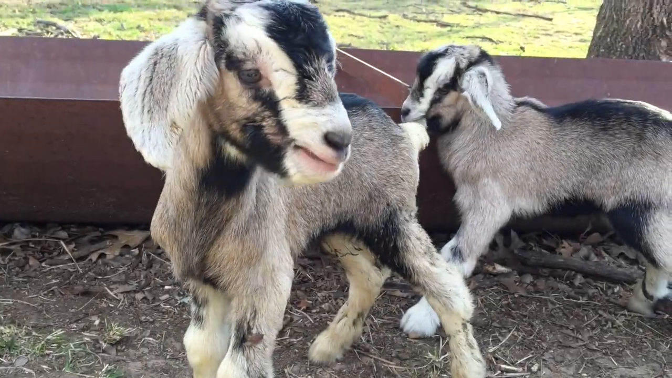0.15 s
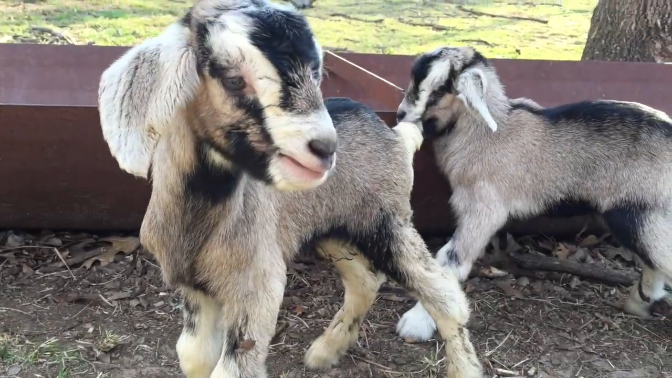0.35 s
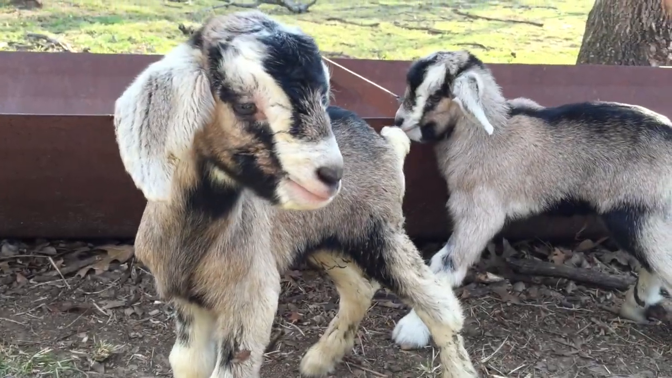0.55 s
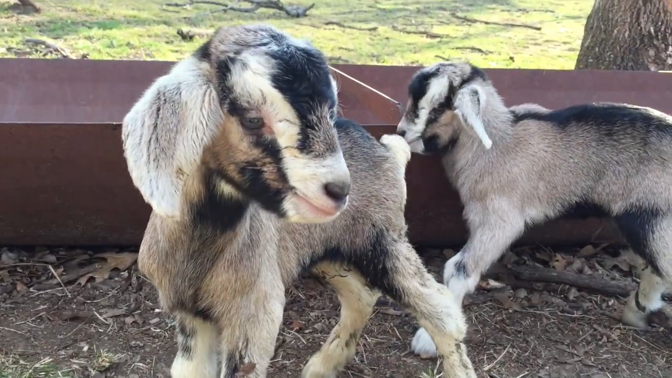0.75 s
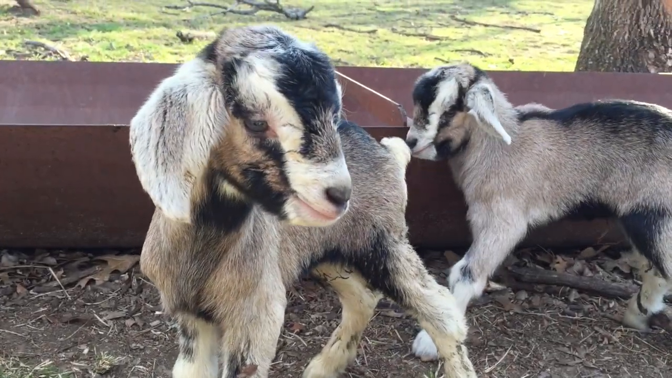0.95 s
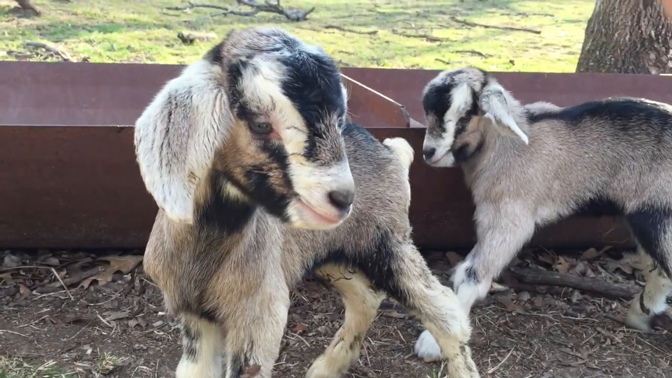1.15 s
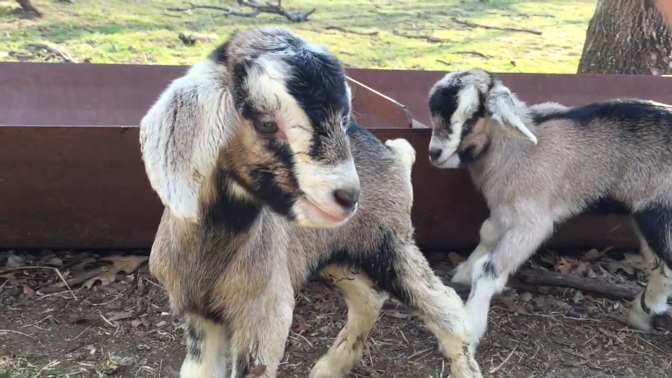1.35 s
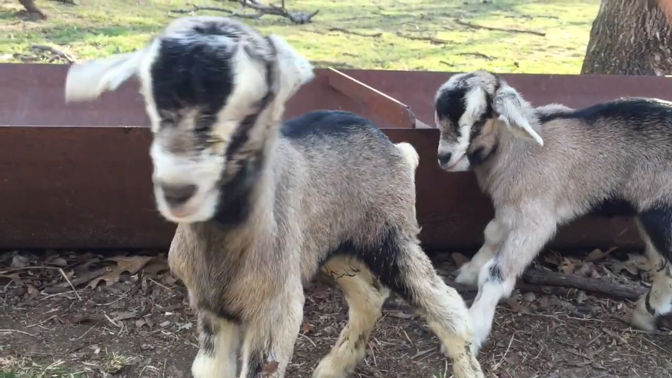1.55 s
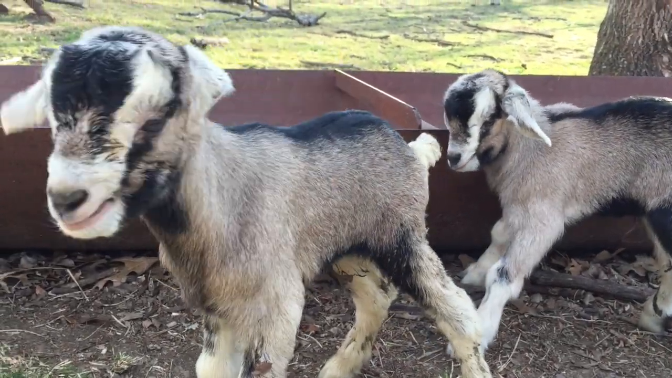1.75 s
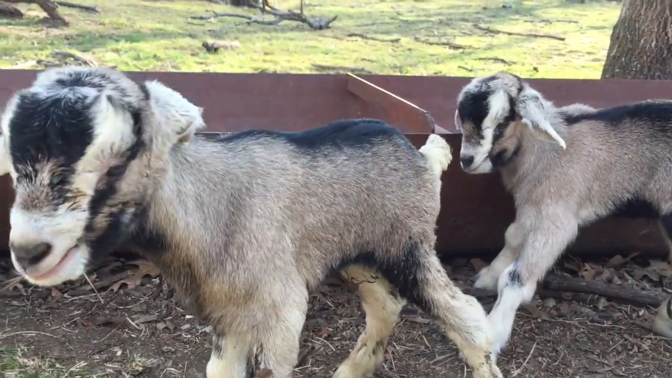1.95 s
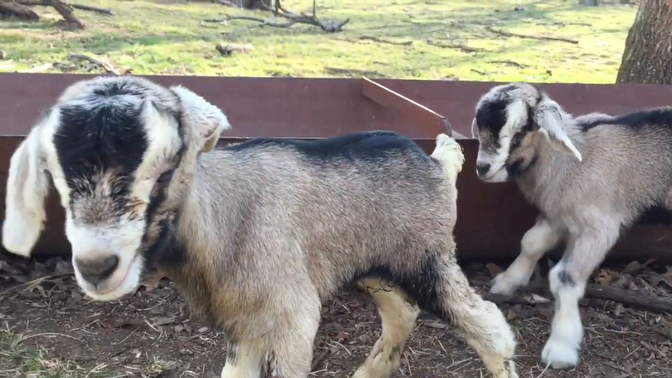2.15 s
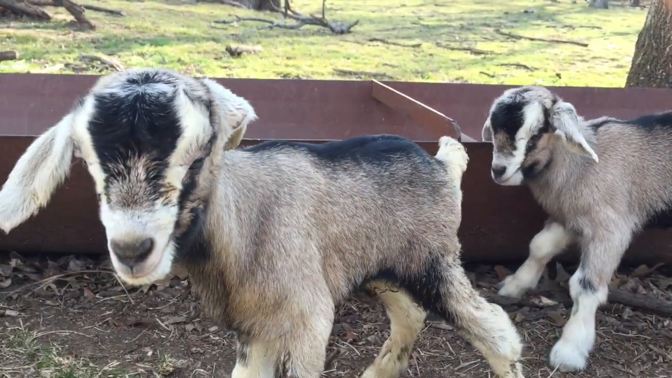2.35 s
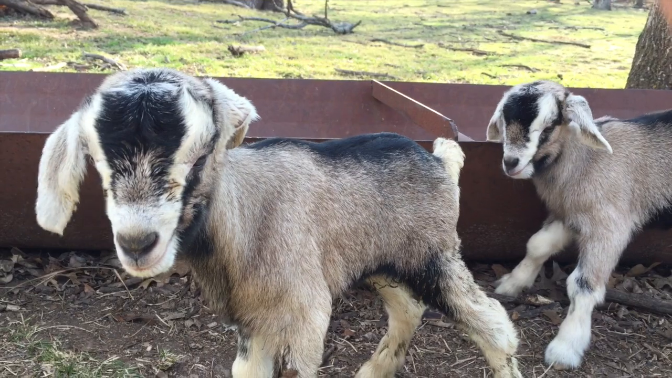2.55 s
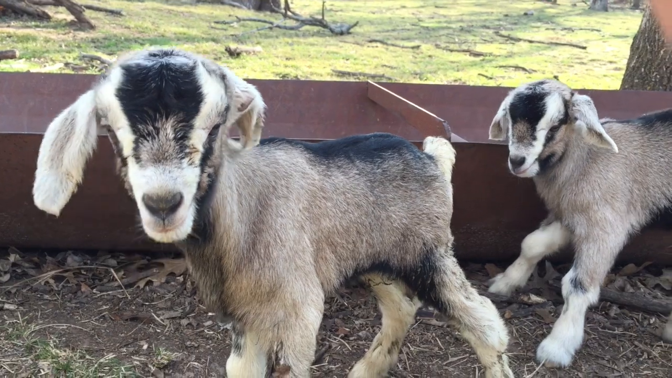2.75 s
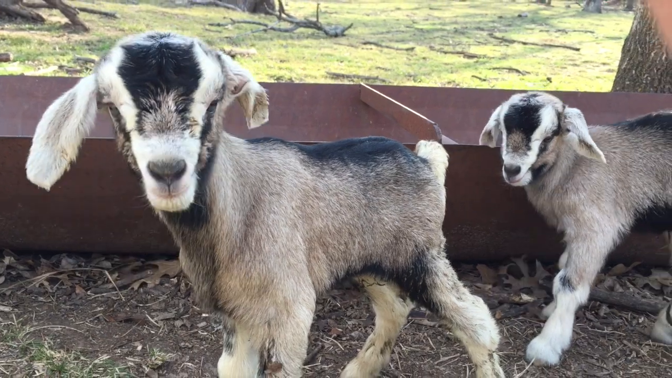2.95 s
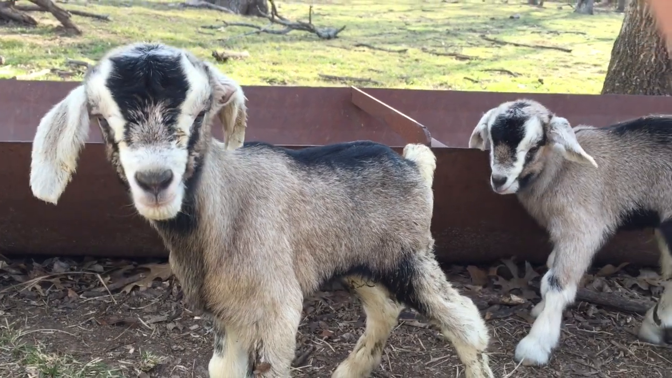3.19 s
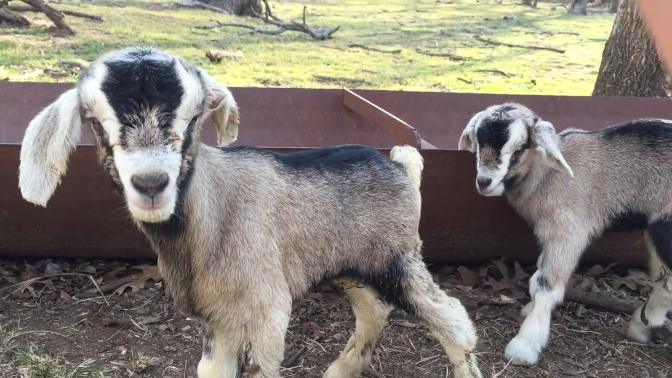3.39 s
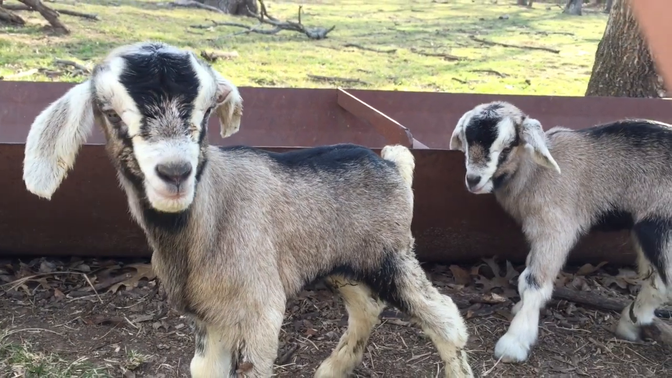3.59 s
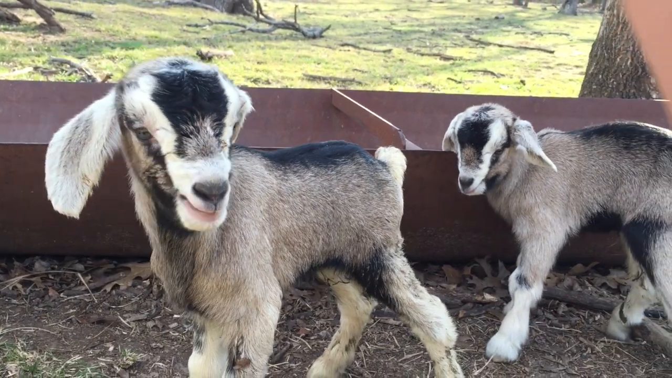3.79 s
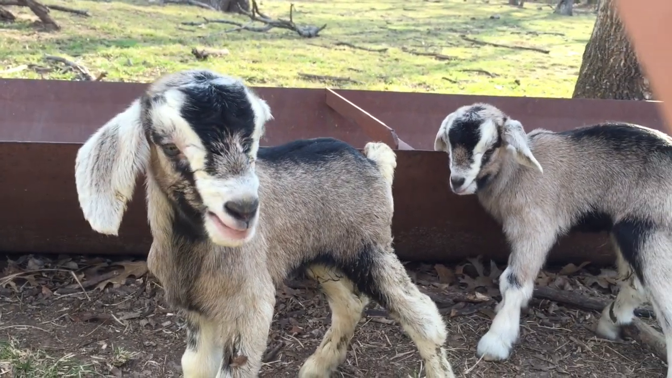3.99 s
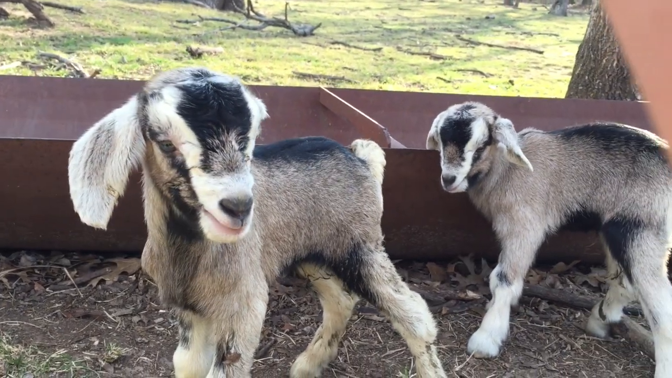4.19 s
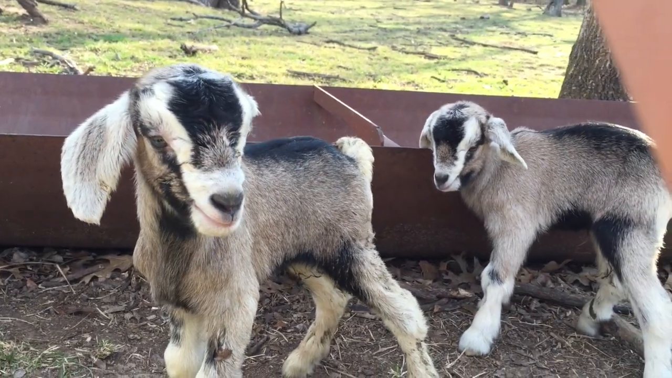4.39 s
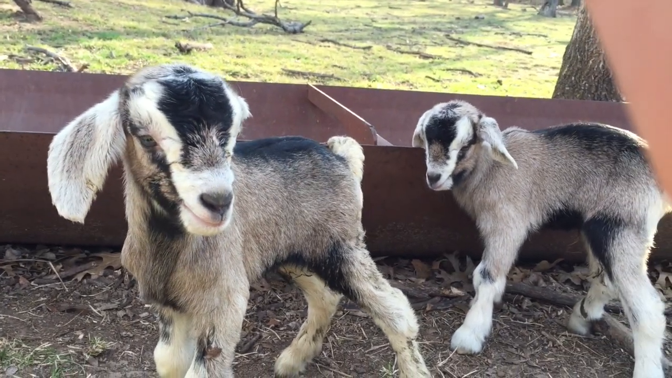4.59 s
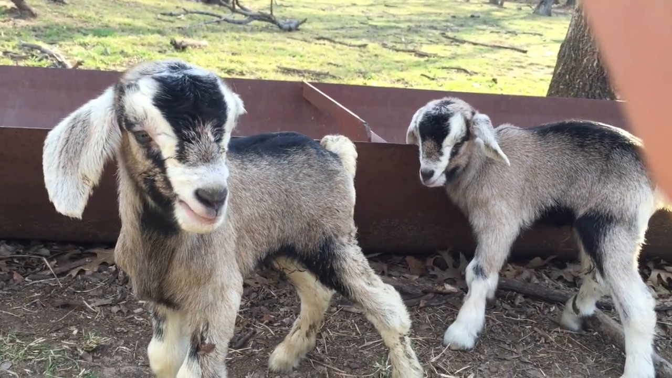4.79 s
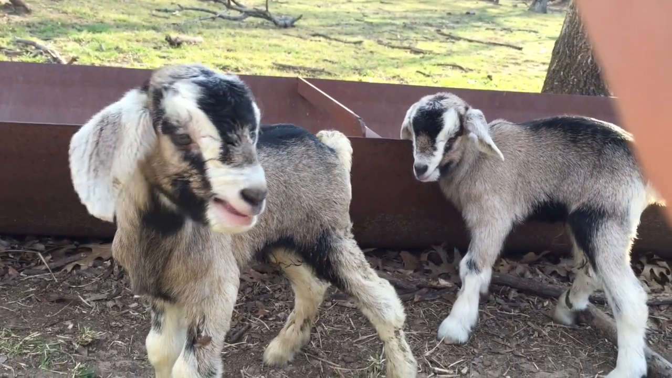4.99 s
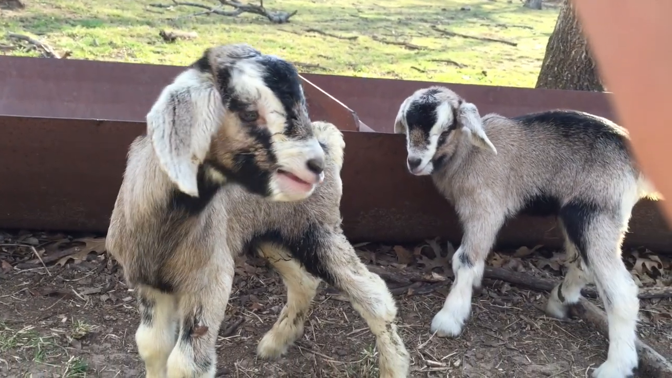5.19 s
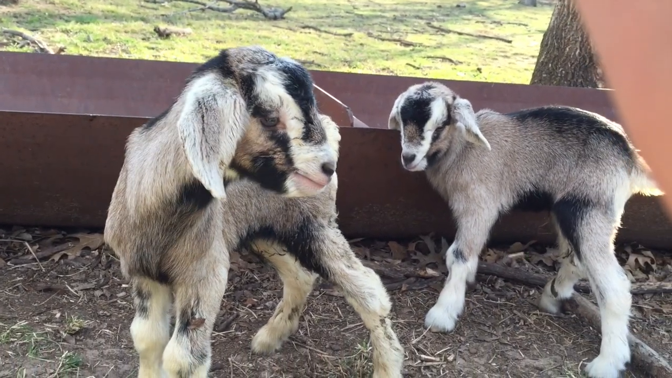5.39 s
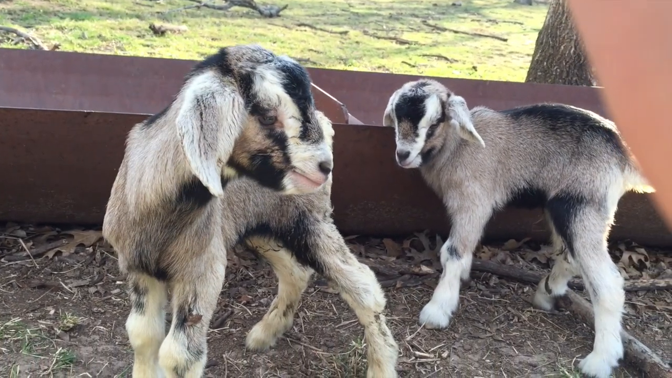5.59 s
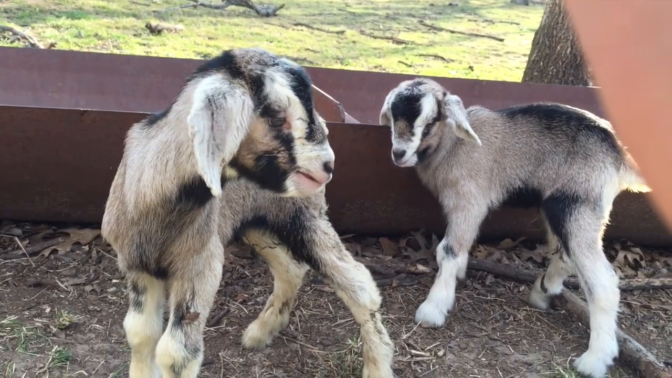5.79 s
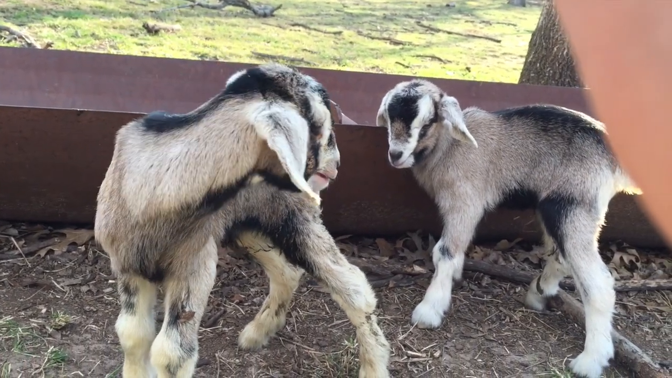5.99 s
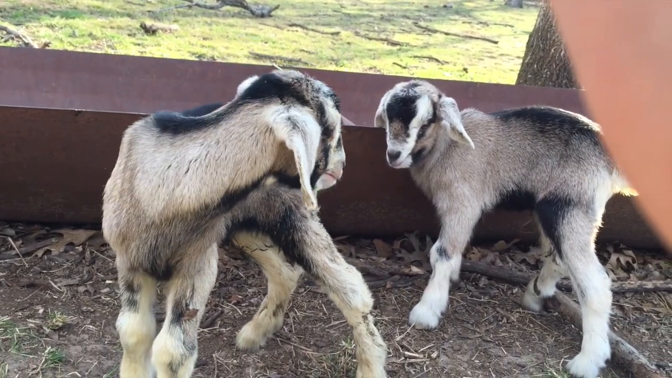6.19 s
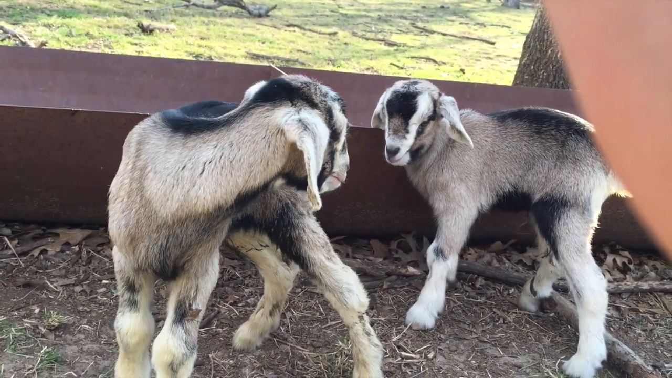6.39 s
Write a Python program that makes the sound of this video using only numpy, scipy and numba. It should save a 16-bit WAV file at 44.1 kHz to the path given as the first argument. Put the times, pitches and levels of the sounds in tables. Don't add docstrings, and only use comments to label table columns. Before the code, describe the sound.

Close outdoor pickup of a young goat giving short, trembling bleats, starting mid-cry and ending mid-cry. Far off another goat holds a steady cry and a fowl squawks hoarsely; later a tiny bird chirps. After the second bleat, straw rustles and another kid murmurs a quieter, breathy bleat. Two brighter, stronger bleats follow, then a late swelling one. Soft low yard hush and little breeze puffs on the microphone run underneath, with barely any echo.

```python
import sys
import numpy as np
from scipy import signal
from scipy.io import wavfile
from scipy.ndimage import uniform_filter1d
from numba import njit

SR = 44100
rng = np.random.default_rng(int(sys.argv[2]) if len(sys.argv) > 2 else 0)


def field_ratio(decibels):
    return 10 ** (np.asarray(decibels, dtype=float) / 20)


def store_wav(level_fs):
    pcm = np.round(np.clip(np.atleast_2d(level_fs), -1, 1) * 32767)
    wavfile.write(sys.argv[1], SR, pcm.T.astype(np.int16))


N = 284004
T = np.arange(N) / SR

# [f/Hz, density/dB per Hz]
HUSH = [(15, -40), (25, -21), (55, -14.5), (119, -5), (204, -6.5), (483, -27), (851, -18), (1810, -25.5),
        (2180, -8), (2500, -29.5), (3270, -28), (4280, -38.5), (15600, -45)]
HUSH_DB = -61
# [t/s, level/dB, length/s]
GUSTS = [(.01, -71, 0.091), (0.88, -64, 0.046), (1.897, -72, 0.17), (3.196, -58.5, .05),
         (3.436, -65.5, 0.079), (3.74, -60.5, 0.079), (3.931, -53.5, 0.073), (4.351, -58.5, 0.068),
         (4.54, -63.5, .06), (4.694, -61, 0.043), (5.33, -67, .15), (5.94, -59, 0.043),
         (6.109, -55.5, 0.068), (6.33, -57, 0.033)]
CALM_DB = -70.5
# [t/s, f/Hz, level/dB]
FAR_GOAT = [
    (.2, 638, -66),
    (.3, 609, -59),
    (.5, 626, -57),
    (.62, 628, -57),
    (.72, 593, -57),
    (.85, 622, -78),
    (1.0, 637, -75),
    (1.3, 588, -96),
]
# [multiple, level/dB]
FAR_ORDERS = [(1, -23), (2, -1), (3, -8), (4, -8.5), (5, -3), (6, -10.5), (7, -9), (8, -20), (9, -24),
              (10, -26.5), (11, -31.5)]
# [t/s, level/dB]
CHIRPS = [
    (2.09, -67),
    (2.134, -67),
    (2.173, -68),
    (2.31, -65),
    (2.327, -74),
    (2.36, -71),
    (2.385, -74),
    (2.5, -67),
]
# [t/s, length/s, top f/Hz, low line level/dB, high line level/dB]
SQUAWKS = [
    (0.463, 0.25, 1222, -55, -62.5),
    (0.942, .3, 1330, -46.5, -64.5),
]
SQUAWK_RISE_S, SQUAWK_SAG, SQUAWK_SAG_S, SQUAWK_RATIO, SQUAWK_FADE_DB = 0.0377, 0.18, .11, 1.42, -20
# [t/s, length/s, level/dB, f/Hz, width/Hz]
PUFFS = [(0.778, 0.018, -69, 6500, 2510), (1.418, 0.038, -67.5, 7800, 9000),
         (2.231, 0.0117, -71.5, 8450, 9000), (2.825, .012, -75, 11300, 3960),
         (2.865, 0.076, -70.5, 9000, 9000), (2.91, .008, -74, 10900, 5000),
         (2.95, 0.0067, -75, 11100, 4100), (2.988, .013, -59, 5300, 12150),
         (3.005, 0.022, -53, 4400, 13100), (3.04, 0.014, -75, 10500, 3000),
         (3.187, .014, -65.5, 4000, 9000), (3.553, 0.065, -71, 5024, 1163), (3.131, 0.026, -52, 1340, 696)]
# [t/s, length/s, level/dB, f/Hz, width/Hz]
CLUCKS = [
    (0.71, 0.22, -60.5, 1540, 500),
    (0.77, .079, -64, 3950, 2480),
    (1.225, .068, -66.5, 2740, 201),
    (1.264, 0.021, -52.5, 1450, 200),
    (1.303, 0.015, -62, 1575, 595),
    (1.34, 0.013, -61, 1480, 694),
    (2.148, 0.29, -76.5, 2660, 120),
    (2.492, 0.43, -87, 2180, 151),
]
# [t/s, level/dB, f/Hz]
CLICKS = [
    (0.445, -48, 900),
    (0.463, -44, 600),
    (1.54, -41.5, 810),
    (1.556, -37, 587),
    (3.684, -36, 623.7),
    (4.772, -37.5, 690),
    (5.32, -40, 601),
    (5.753, -41.5, 603),
    (3.588, -56, 1407),
    (3.59, -60, 5220),
]
CLICK_S, CLICK_WIDTH_HZ = 0.013, 760

# [t/s, top f/Hz, top level/dB, dip f/Hz]
SOFT_THROBS = [
    (3.145, 360, -64, 400),
    (3.248, 492, -64.5, 474.4),
    (3.352, 500, -60, 448.5),
    (3.455, 493, -61, 444),
]
# [onset t/s, catch/dB, dips/dB, last sink/s, sink depth/dB]
SOFT_BLEAT = [
    (3.112, 5, 9, .05, 9),
]
# [pitch rise, pitch fall, level rise, level fall, fade-out/s]
SOFT_MANNER = [(.5, 1.3, .8, 1.4, .02)]
SOFT_DIP_S = .045
# [f/Hz, width/Hz, level/dB]
SMALL_THROAT = [(1450, 170, 7.5), (2160, 840, -17), (3950, 250, -2), (5120, 410, 0), (6050, 550, -9),
                (9000, 450, -16.5), (12200, 1500, -25)]

# [t/s, top f/Hz, top level/dB, f/Hz of the dip after it]
THROBS = [(0.0, 420, -32, 264), (.105, 437.7, -26, 283.2), (.2, 461, -20.5, 278.8), (.296, 453.8, -22, 269),
          (.4, 425.2, -27, 260.3), (1.58, 413.4, -27.5, 238), (1.673, 420, -27.5, 252),
          (1.768, 432.8, -21.5, 287), (1.863, 454.6, -22.5, 297), (1.965, 453.2, -23, 250.9),
          (3.722, 480.6, -23.5, 395.9), (3.805, 513, -15.5, 432), (3.897, 507.4, -16, 409.2),
          (3.992, 501.6, -17, 371.2), (4.088, 484.3, -20.5, 300.7), (4.188, 462.7, -23, 279),
          (4.286, 390, -30, 265.5), (4.808, 438, -29, 366), (4.904, 474.5, -20.5, 387),
          (4.997, 487, -18.5, 418.4), (5.09, 490.8, -19.5, 392.6), (5.182, 487.5, -22, 385),
          (5.28, 476, -25, 333.5), (5.791, 420, -36, 281), (5.89, 465, -28, 291),
          (5.988, 450, -28.5, 306.4), (6.083, 460.5, -27.5, 324)]
# [onset t/s, catch below the first top/dB, depth of the dips/dB, last sink/s, sink depth/dB]
BLEATS = [
    (-.03, 6, 9, 0.058, 12.5),
    (1.553, 9, 8.5, 0.062, 14.5),
    (3.685, 6.5, 8.5, 0.051, 8),
    (4.784, 4.5, 9, .04, 7.5),
    (5.757, 12, 8, 0.042, 10.5),
]
# [pitch rise, pitch fall, level rise, level fall, fade-out/s]
MANNER = [(0.99, .85, 1.28, 0.47, .04), (1.2, 0.92, 1.7, 0.36, 0.045), (1.3, 0.7, 1.12, 0.62, .025),
          (1.4, 0.95, 1.3, 0.52, 0.023), (0.86, 0.7, 1.24, 0.5, .024)]
CATCH_S, CATCH_RISE, ONSET_DB = .009, 1.05, -28.5
DIP_S, DIP_S_PER_SAG, DIP_DB_PER_SAG = .016, .085, 8.5
# [onset pitch share of first top, second harmonic/dB, throb of fundamental/dB,
# fourth resonance f/Hz at onset, f/Hz at the end]
LARYNX = [(.85, 2.9, 8, 3540, 4100), (0.91, -0.3, 11, 3680, 4000), (.85, -4.4, 13, 3924, 4184),
          (.85, -3.2, 11.5, 3920, 3960), (0.64, 15, -1, 4100, 3944)]
LOUD_LAG_S, SKIRT_HZ = 0.0049, 438
# [lowest harmonics/dB, treble/dB, air above 9 kHz/dB, breathiness 0-1,
# depth of the side-cavity dip 0-1]
HEAD = [(11, -1.1, -8.5, .17, .6), (12, -2.5, 17, .19, .95), (14, 3, -2.5, .05, 0.8), (14, 4, -1.5, .08, 1),
        (5.5, -3, 18, .15, 0.94)]
# [first resonance shut f/Hz, wide f/Hz, opening time/s, share closed at the end 0-1,
# drop of the first under a push 0-1]
JAW = [(980, 1540, 0.41, 0.48, 0.07), (977, 1560, 0.41, 0.13, 0.16), (900, 1458, .06, .35, 0.15),
       (865, 1504, .09, 0.09, .05), (588.4, 1670, 0.13, 0, 0)]
CLOSING_S = .11
SHUT_DB, SECOND_SHUT_DB, SECOND_WIDE_DB = -2.5, 3.5, -1.5
# [second resonance f/Hz at onset, at the end f/Hz, third shut f/Hz, third wide f/Hz,
# third level/dB]
TONGUE_SET = [(2020, 1870, 2600, 2370, -5.5), (2080, 1830, 2820, 2080, -5.5), (2060, 2120, 2200, 2700, -8),
              (2120, 2370, 2600, 3455, -5.5), (1910, 3114, 3270, 3045, -5.5)]
END_SECOND_HZ, END_FOURTH_HZ, END_HOARSE = -200, 400, 0.058
# [depth of the nasal dip 0-1, its f/Hz, change over the bleat of the third resonance/dB,
# of the air above 9 kHz/dB]
NASAL = [(0.8, 740, -3, 7.5), (0.57, 833, -2, -1), (1, 840, -11, -10), (1, 740, -1, 12), (0.02, 740, -6, 4)]
NASAL_WIDTH_HZ = 100
# [width/Hz, level/dB]
MOVING = [
    (168, 4),
    (420, -4),
    (238, -0.5),
]
# [f/Hz, width/Hz, level/dB]
FIFTH = (4070, 2200, -16.5)
# [f/Hz, width/Hz, level/dB]
NOSE = [(5594, 150, -25.5), (6260, 630, -17), (8380, 1420, -21)]
# [f/Hz, width/Hz, level/dB]
AIR = [(10800, 370, -46.5), (12800, 1300, -40), (15000, 1400, -40.5)]
END_UPPER_DB, UPPER_THROB_DB = -5, 0
WANDER = .025

# [delay t/s, level/dB]
BOUNCES = [
    (.0021, -17.5),
    (.0057, -36),
    (.0093, -24),
]
YARD_T60_S, YARD_DB = 0.13, -21
CEILING = .7


@njit
def svf(x, hz, width):
    y, b, l = np.empty(len(x)), 0., 0.
    for i in range(len(x)):
        g, k = np.tan(np.pi * hz[i] / SR), width[i] / hz[i]
        v = (b + g * (x[i] - l)) / (1 + g * (g + k))
        b, l, y[i] = 2 * v - b, l + 2 * g * v, k * v
    return y


def band(x, hz, width):
    return svf(x + 1e-18, np.clip(hz + 0 * x, 20, .45 * SR), np.clip(width + 0 * x, 10, SR))


def unit(x):
    return x / np.sqrt(np.mean(x ** 2))


def walk(rate):
    k = int(SR / rate)
    held = np.repeat(rng.standard_normal(N // k + 1), k)
    return unit(uniform_filter1d(uniform_filter1d(held, k), k)[:N])


def columns(table):
    s, *rest = np.transpose(table)
    return [np.interp(T, s, c) for c in rest]


def echoes(x, t60, dull_hz):
    tail = band(rng.standard_normal(N), dull_hz, 2 * dull_hz)[:SR] * field_ratio(-60 * T[:SR] / t60)
    return signal.fftconvolve(x, tail / np.sqrt(np.sum(tail ** 2)))[:N]


def hush():
    yard, swell = 0, walk(0.93)
    hz_pts, db_pts = np.transpose(HUSH)
    for hz in 40 * 2 ** np.arange(0, 9, .5):
        flicker = (1.2 + 1.3 * (hz < 300)) * walk(7)
        db = np.interp(np.log(hz), np.log(hz_pts), db_pts) + swell + flicker
        yard = yard + field_ratio(db) * band(band(rng.standard_normal(N), hz, hz / 2), hz, hz / 2)
    rumble = band(band(band(rng.standard_normal(N), 75, 70), 62, 110), 51, 90)
    gusts = sum(field_ratio(db) * np.exp(-((T - s) / length) ** 2) for s, db, length in GUSTS)
    breeze = field_ratio(CALM_DB + 2.5 * walk(18.0))
    return unit(yard) * field_ratio(HUSH_DB) + unit(rumble) * (breeze + gusts)


def squawks():
    out = np.zeros(N)
    for start, length, top_hz, low_db, high_db in SQUAWKS:
        since = np.clip(T - start, 0, length)
        rise = np.clip(since / SQUAWK_RISE_S, 0, 1)
        sagging = np.exp(-np.maximum(since - SQUAWK_RISE_S, 0) / SQUAWK_SAG_S)
        hz = top_hz * (1 - SQUAWK_SAG * (1 - rise * sagging))
        shape = np.sqrt(rise) * np.clip((length - since) / 0.013, 0, 1)
        for ratio, db, fade_db in [(1, low_db, SQUAWK_FADE_DB), (SQUAWK_RATIO, high_db, 1.5)]:
            wobble = ratio * hz * (1 + .025 * walk(150))
            level = field_ratio(db + fade_db * since / length + 2.84 * walk(70.83))
            out += shape * level * np.sin(2 * np.pi * np.cumsum(wobble) / SR)
    return out


def far_calls():
    hz, db = columns(FAR_GOAT)
    unsteady = 0.016 * np.clip(T - .45, .1, .5) / 0.23 * walk(150)
    phase = 2 * np.pi * np.cumsum(hz * (1 + unsteady)) / SR
    harmonics = sum(field_ratio(d + 0.65 * walk(45)) * np.sin(k * phase) for k, d in FAR_ORDERS)
    goat = field_ratio(db) * (T > .2) * (T < 1.3) * harmonics
    calls = goat + squawks()
    chirps = sum(field_ratio(d) * np.exp(-((T - s) / 0.0037) ** 2) for s, d in CHIRPS)
    bird = chirps * np.sin(2 * np.pi * 3330 * T)
    return 1.36 * calls + 0.85 * echoes(calls, 1.0, 3640) + bird


def puffs():
    air, out = rng.standard_normal(N) * field_ratio(1.0 * walk(210)), np.zeros(N)
    rows = [tuple(row) + (False,) for row in list(PUFFS) + list(CLUCKS)]
    rows += [(s, CLICK_S, db, hz, CLICK_WIDTH_HZ, True) for s, db, hz in CLICKS]
    for s, length, db, hz, width, sharp in rows:
        reach = 2 * length + .1
        near = slice(max(int((s - reach) * SR), 0), int((s + reach) * SR))
        since = (T[near] - s) / length
        if sharp:
            shape = np.clip(since * 10, 0, 1) * np.exp(-np.abs(since))
        else:
            shape = np.exp(-(since / 0.64) ** 2)
        burst = field_ratio(db) * unit(band(band(air[near], hz, width), hz, 1.1 * width)) * shape
        out[near] += band(burst, hz, 2 * width) if sharp else burst
    return out


def bend(t, s, values, rise, fall):
    place = np.interp(t, s, np.arange(len(s)))
    k = np.minimum(place.astype(int), len(s) - 2)
    swing = .5 - .5 * np.cos(np.pi * (place - k) ** np.where(k % 2, rise, fall))
    return values[k] + swing * (values[k + 1] - values[k]), k, swing


def shudder(throbs, bleats, manner, dip_s, onset_pitch, lag_s):
    hz, db, opening, fade, ends = np.full(N, 400.), np.full(N, -140.), np.zeros(N), np.zeros(N), []
    rows = np.array(throbs)
    owner = np.searchsorted(np.array(bleats)[:, 0], rows[:, 0]) - 1
    for b, (onset_s, catch_db, depth_db, sink_s, sink_db) in enumerate(bleats):
        top_s, top_hz, top_db, dip_hz = rows[owner == b].T
        hz_rise, hz_fall, db_rise, db_fall, out_s = np.clip(manner[b], .005, 3)
        sag = 1 - dip_hz[:-1] / top_hz[:-1]
        dip_at = top_s + np.r_[dip_s + DIP_S_PER_SAG * sag, sink_s]
        between_db = (top_db[1:] + top_db[:-1]) / 2 - depth_db - DIP_DB_PER_SAG * sag
        dip_db = np.r_[between_db, top_db[-1] - sink_db]
        s = np.r_[onset_s, onset_s + CATCH_S, np.ravel([top_s, dip_at], "F")]
        onset_hz = onset_pitch[b] * top_hz[0] * np.array([1, CATCH_RISE])
        pitch = np.r_[onset_hz, np.ravel([top_hz, dip_hz], "F")]
        level = np.r_[top_db[0] + ONSET_DB, top_db[0] - catch_db, np.ravel([top_db, dip_db], "F")]
        end = s[-1] + out_s / 2
        ends.append(end)
        inside = (T >= s[0]) & (T < end)
        t = T[inside]
        hz[inside], _, _ = bend(t, s, pitch, hz_rise, hz_fall)
        late = s + lag_s * np.r_[0, 0, np.tile([1, .5], len(top_s))]
        db[inside], k, push = bend(t, late, level, db_rise, db_fall)
        opening[inside] = np.where(k % 2, push, (1 - push) * (k > 0))
        start = np.clip((t - s[0]) / 0.0056, 0, 1)
        fade[inside] = start ** 0.58 * np.clip((end - t) / out_s, 0, 1)
    return hz, field_ratio(db) * np.sqrt(fade), opening, fade, np.array(ends)


def folds(hz, hoarse):
    slide = np.clip(np.abs(np.gradient(np.log(hz))) * SR / 10, 0, 1)
    jitter = (.06 * hoarse + 0.014 * slide) * walk(250)
    phase = 2 * np.pi * np.cumsum(hz * (1 + jitter)) / SR
    harmonics = sum(np.cos(k * phase) * (k * hz < .37 * SR) for k in range(1, 45))
    pulses = harmonics * np.sqrt(2 * hz / SR) * 2
    breath = rng.standard_normal(N) * (1 + np.cos(phase - .6))
    return -pulses * field_ratio(5 * hoarse * walk(250)), breath, phase


def tract(x, modes, start=0):
    return sum((-1) ** (k + start) * field_ratio(db) * band(x, hz, width) for k, (hz, width, db) in enumerate(modes))


def narrows(x, modes):
    return sum(field_ratio(db + 2.3 * walk(30)) * band(band(x, hz, 1.6 * width), hz, 1.6 * width)
               for hz, width, db in modes)


def second_kid():
    hz, gain, opening, fade, _ = shudder(SOFT_THROBS, SOFT_BLEAT, SOFT_MANNER, SOFT_DIP_S, [.9], 0)
    pulses, breath, phase = folds(hz, 0.012)
    source = pulses * opening ** 2 + .2 * breath * (1 - opening / 2)
    voice = narrows(source, SMALL_THROAT[:4]) + narrows(0.21 * source + 0.41 * breath, SMALL_THROAT[4:])
    flow = field_ratio(-14.5) * np.sin(phase) + field_ratio(-20) * np.sin(2 * phase)
    hiss = field_ratio(-52.5) * fade * (1 - 0.33 * opening) * narrows(breath, SMALL_THROAT[2:4])
    return hiss + field_ratio(17.5) * gain * (voice + opening * flow)


def articulation(ends):
    onsets = np.array(BLEATS)[:, 0]
    b = np.maximum(np.searchsorted(onsets, T) - 1, 0)
    since, left = T - onsets[b], ends[b] - T
    done = np.clip(since / (since + left), 0, 1)
    ending = np.clip(1 - left / CLOSING_S, 0, 1)
    shut_hz, wide_hz, open_s, closed, drop = np.array(JAW)[b].T
    early_hz, late_hz, third_shut_hz, third_wide_hz, third_db = np.array(TONGUE_SET)[b].T
    low_db, treble_db, air_db, hoarse, dip = np.array(HEAD)[b].T
    _, overtone_db, throb_db, fourth_hz, fourth_late_hz = np.array(LARYNX)[b].T
    nasal, nasal_hz, third_change_db, air_change_db = np.array(NASAL)[b].T
    jaw = (1 - np.exp(-since / np.maximum(open_s, .01))) * (1 - closed * ending)
    mouth = (shut_hz + (wide_hz - shut_hz) * jaw,
             early_hz + (late_hz - early_hz) * done + END_SECOND_HZ * ending,
             third_shut_hz + (third_wide_hz - third_shut_hz) * jaw,
             fourth_hz + (fourth_late_hz - fourth_hz) * done + END_FOURTH_HZ * ending)
    colour = (low_db + SHUT_DB * jaw,
              SECOND_SHUT_DB + (SECOND_WIDE_DB - SECOND_SHUT_DB) * jaw,
              third_db + third_change_db * (done - .5),
              treble_db,
              air_db + air_change_db * (done - .5),
              overtone_db, throb_db)
    return mouth, colour, drop, hoarse + END_HOARSE * ending, dip, nasal, nasal_hz, ending


def near_kid():
    onset_pitch = np.array(LARYNX)[:, 0]
    hz, gain, opening, fade, ends = shudder(THROBS, BLEATS, MANNER, DIP_S, onset_pitch, LOUD_LAG_S)
    mouth, colour, drop, hoarse, dip, nasal, nasal_hz, ending = articulation(ends)
    first_hz, *higher_hz = mouth
    low_db, second_db, third_db, treble_db, air_db, overtone_db, throb_db = colour
    second_hz, third_hz, fourth_hz = (f * (1 + WANDER * walk(14)) for f in higher_hz)
    hoarse = np.clip(hoarse, 0, .2)
    pulses, breath, phase = folds(hz, hoarse)

    (w1, db1), (w2, db2), (w4, db4) = MOVING
    source = pulses + hoarse * breath
    first = tract(source, [(first_hz * (1 - drop * opening), w1 * (1 + 0.38 * opening ** 2), db1)])
    upper = tract(source, [(second_hz, w2, db2 + second_db),
                           (third_hz, 550, third_db - 2.2 * (1 - opening)),
                           (fourth_hz * (1 - 0.068 * opening), w4, db4),
                           FIFTH], start=1)
    first, upper = signal.sosfilt(signal.butter(4, 4600, fs=SR, output="sos"), [first, upper])
    first, upper = signal.sosfilt(signal.butter(2, SKIRT_HZ, "high", fs=SR, output="sos"), [first, upper])

    bright = .9 * pulses + .33 * breath
    airy = field_ratio(air_db) * narrows(bright, AIR[:-1]) + field_ratio(.3 * air_db) * narrows(bright, AIR[-1:])
    top = field_ratio(-8.0 * (1 - opening)) * (narrows(bright, NOSE[-1:]) + airy)
    high = field_ratio(treble_db - 2.75 * (2.0 - opening)) * (narrows(bright, NOSE[:-1]) + top)

    fundamental = field_ratio(-28.0 - throb_db * (1.5 - opening)) * np.sin(phase)
    overtone = field_ratio(overtone_db - 11.0 - 2.75 * (7.5 - opening)) * np.sin(2 * phase + 1.9)
    upper_gain = fade ** 11.0 * field_ratio(END_UPPER_DB * ending ** 2 + UPPER_THROB_DB * (.5 - opening))
    voice = first + upper_gain * (upper + high) + field_ratio(low_db) * (fundamental + overtone)
    voice = voice - np.clip(dip, 0, 1) * band(voice, 4880, 600)
    voice = voice - np.clip(nasal, 0, 1) * band(voice, nasal_hz, NASAL_WIDTH_HZ)
    return field_ratio(9.5) * gain * voice


def scene():
    kids = near_kid() + second_kid()
    bounced = sum(field_ratio(db) * np.interp(T - delay, T, kids) for delay, db in BOUNCES)
    yard = field_ratio(YARD_DB) * echoes(kids, YARD_T60_S, 2900)
    mid = hush() + far_calls() + puffs() + kids + bounced + yard
    return np.array([mid, mid])


def top_cut(x):
    return signal.sosfilt(signal.butter(12, 15730, fs=SR, output="sos"), x)


def record(dry):
    rounded = CEILING * np.tanh(dry / CEILING)
    mix = signal.sosfilt(signal.butter(2, 42, "high", fs=SR, output="sos"), rounded)
    return top_cut(mix)


dry = scene()
out = record(dry)
store_wav(out)
```